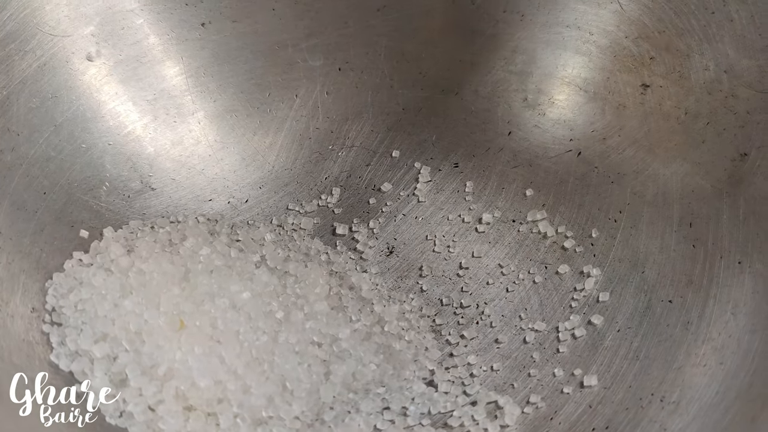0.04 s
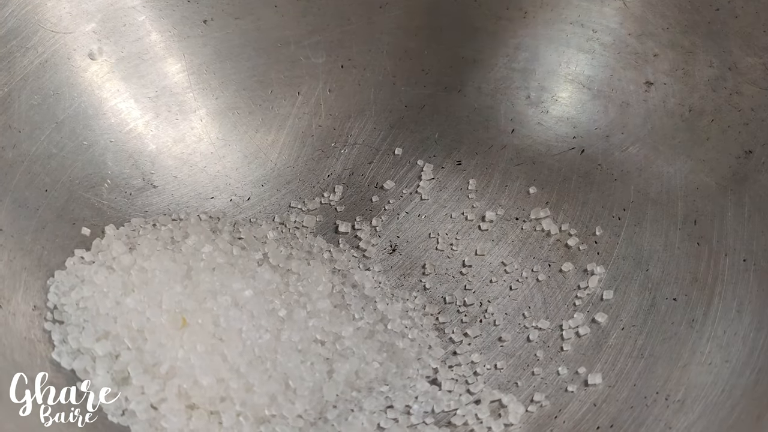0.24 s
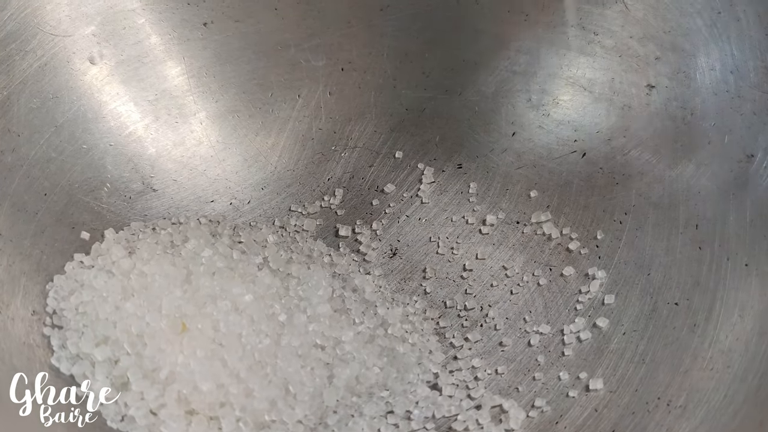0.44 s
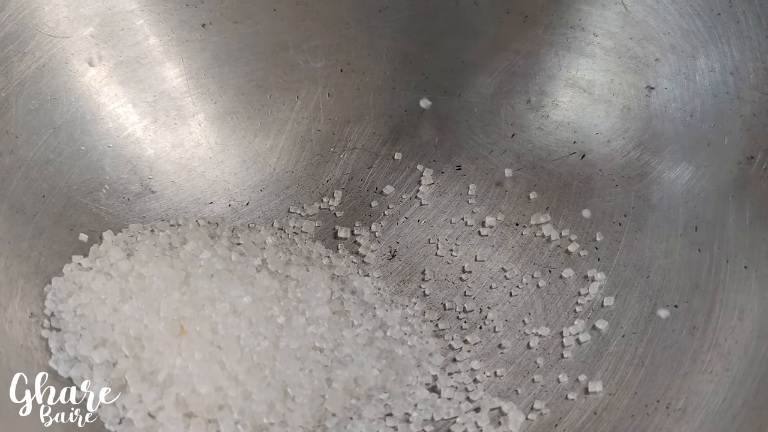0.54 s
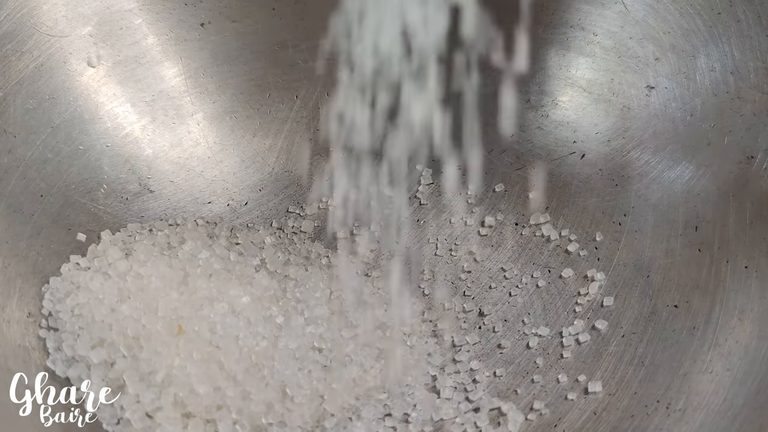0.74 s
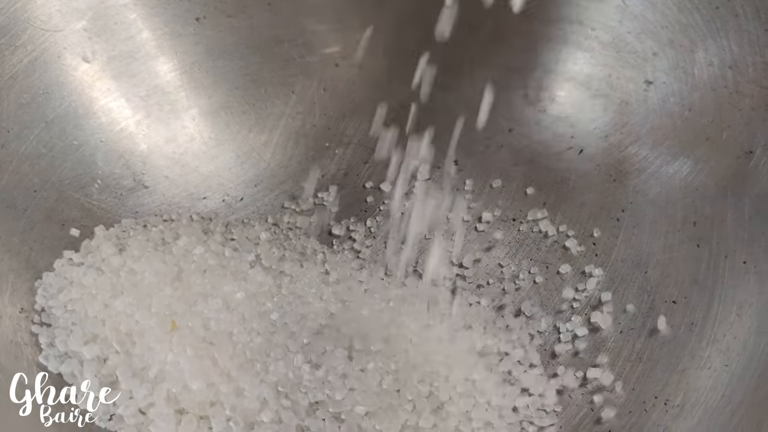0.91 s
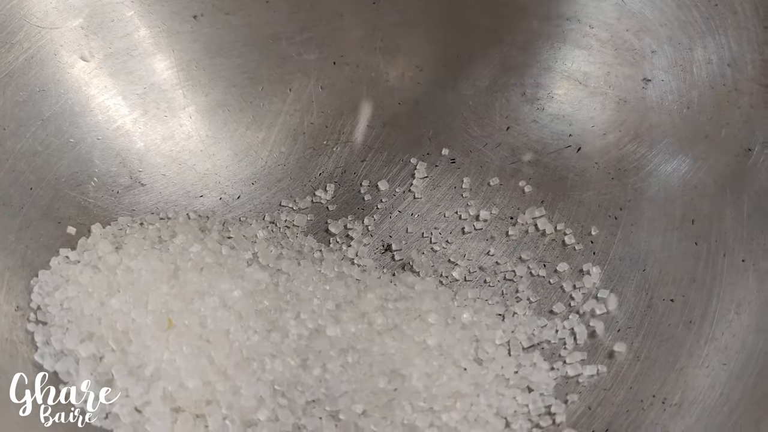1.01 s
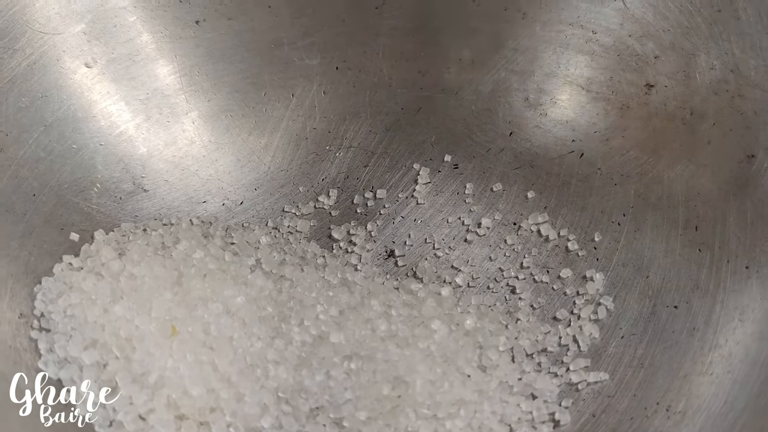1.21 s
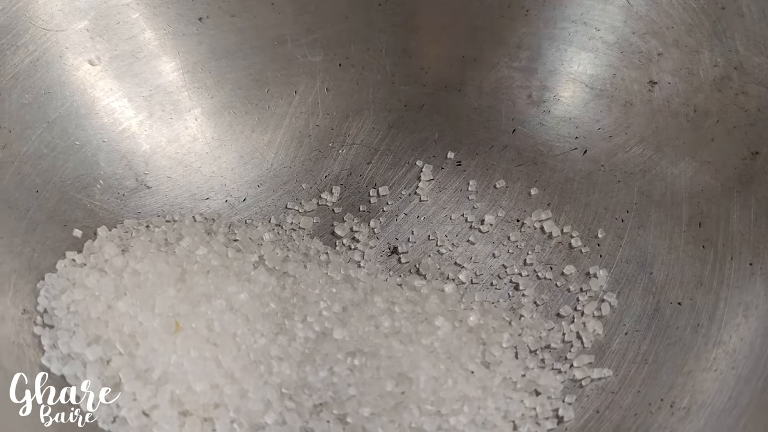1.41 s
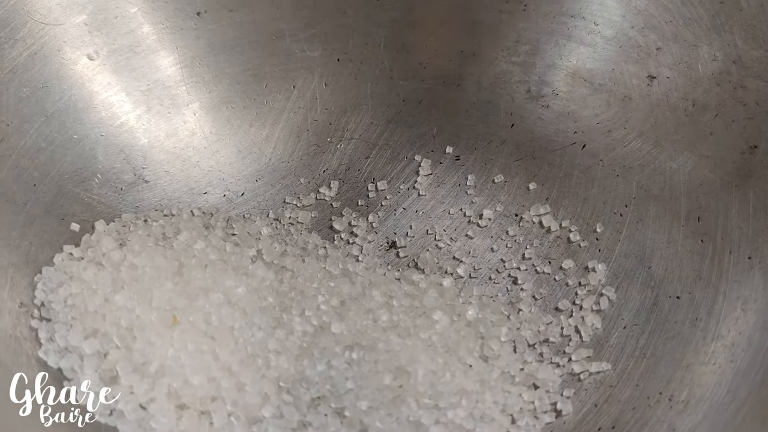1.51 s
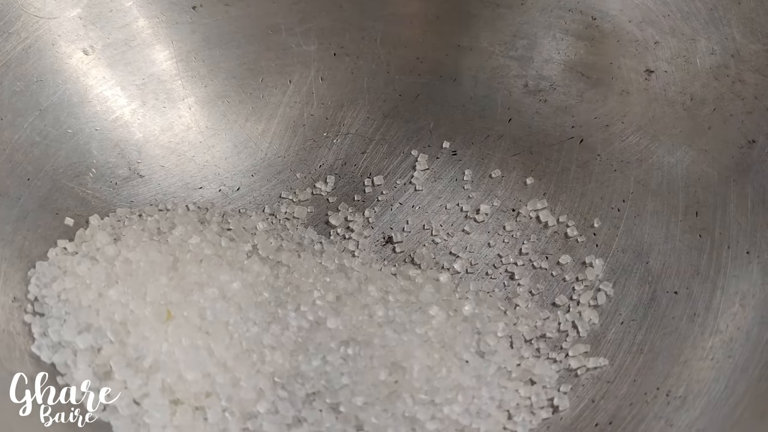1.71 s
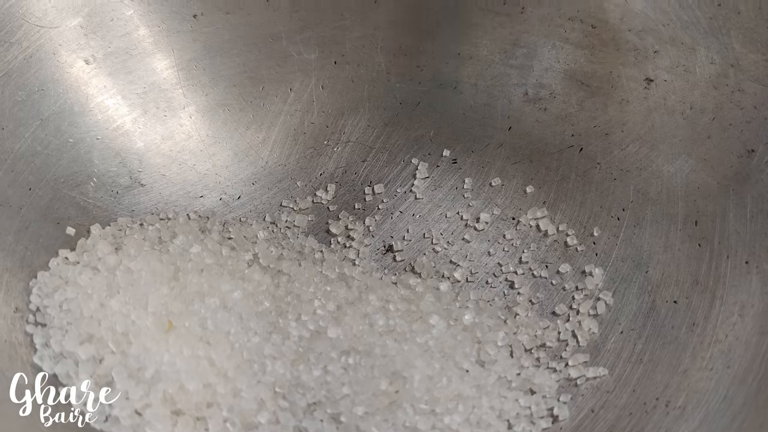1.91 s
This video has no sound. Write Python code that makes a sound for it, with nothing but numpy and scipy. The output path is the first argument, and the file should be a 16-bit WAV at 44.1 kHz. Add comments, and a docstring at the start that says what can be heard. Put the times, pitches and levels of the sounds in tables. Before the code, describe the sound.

Coarse sugar is spooned into a dry steel pan, close in stereo. Crystals crunch and snap in a jar until 0.5 s, sharpest near 0.4. Stray grains tick on metal from 0.57 s; a dense, bright, ringing rush pours at 0.85-1.0 s, then settles amid faint squeaks. From 1.33 s the spoon crunches into the jar again, tapping it at 1.9. Low kitchen rumble and hum.

```python
"""In a small kitchen, coarse sugar is spooned from a jar into a dry steel pan, heard in stereo.
Noise bursts and tiny grains crunch as the spoon scoops; a few stray crystals tick on the metal.
The spoonful patters down in one short rush of grains, coloured by the pan's ringing modes.
The spoon digs back into the jar and taps it; faint squeaks and a low hum lie around it all."""
import sys
import numpy as np
from scipy import signal
from scipy.fft import rfft, irfft
from scipy.io import wavfile

SR = 44100
rng = np.random.default_rng(int(sys.argv[2]) if len(sys.argv) > 2 else 0)


def put_to_file(sound):
    """Save the sound as 16-bit audio at rate SR, in the file named by the first command-line argument."""
    columns = np.atleast_2d(sound).T  # one column per channel
    safe = np.clip(columns, -1, 1)
    whole_steps = np.round(safe * 32767)
    wavfile.write(sys.argv[1], SR, whole_steps.astype(np.int16))


N = 85995
T = np.arange(N) / SR


def amp(db):
    """Decibels to gain."""
    return 10 ** (np.asarray(db) / 20)


def unit(x):
    """Scales to rms 1."""
    return x / np.sqrt(np.mean(x ** 2) + 1e-20)


def read(points, hz):
    """Reads a table on a log-frequency axis."""
    f, value = np.transpose(points)
    return np.interp(np.log(hz + 1), np.log(f + 1), value)


def level(points):
    """Gain over time from a dB curve, fading to silence within 200 samples outside it."""
    s, db = np.transpose(points)
    inside = np.minimum(T - s[0], s[-1] - T)
    return amp(np.interp(T, s, db)) * np.clip(inside * SR / 200 + 1, 0, 1)


def pushes(table):
    """Each push builds up smoothly, then the crystals settle; overlaps add as power."""
    power = 0
    for s, db, rise, fall in table:
        log_shape = np.where(T < s, -.5 * ((T - s) / rise) ** 2, (s - T) / fall)
        power = power + (amp(db) * np.exp(log_shape)) ** 2
    return np.sqrt(power)


def wander(rate_hz):
    """Smooth random motion of rms 1."""
    hz = np.fft.rfftfreq(N, 1 / SR)
    slow = rfft(rng.standard_normal(N)) * np.exp(-(hz / rate_hz) ** 2)
    return unit(irfft(slow, N))


def add(mix, s, sound):
    """Mixes a stereo sound in at a time."""
    part = mix[:, max(round(s * SR), 0):][:, :sound.shape[1]]
    part += sound[:, :part.shape[1]]


def through(x, response):
    """Convolves each channel with a response."""
    return signal.fftconvolve(np.atleast_2d(x), np.atleast_2d(response), axes=1)[:, :N]


def above(x, hz, order):
    """High-pass."""
    return signal.sosfilt(signal.butter(order, min(hz, SR / 3), "high", fs=SR, output="sos"), x)


def colour(x, db_at, size=4096):
    """Minimum-phase filter of unit energy that follows the given dB over frequency."""
    log_gain = np.log(amp(db_at(abs(np.fft.fftfreq(size, 1 / SR)))))
    spectrum = np.exp(np.conj(signal.hilbert(log_gain)))
    h = np.fft.ifft(spectrum).real[:size // 2]
    return through(x, h / np.linalg.norm(h))


def resonate(x, hz, width):
    """A gliding resonance of gain 1: shift down to 0 Hz, smooth, shift back."""
    turn = np.exp(2j * np.pi * np.cumsum(hz) / SR)
    r = np.exp(-np.pi * width / SR)
    return 2 * (turn * signal.lfilter([1 - r], [1, -r], x / turn + 1e-18)).real


def placed(x, image):
    """Sets width and left-right balance by frequency."""
    hz, rows = np.fft.rfftfreq(N, 1 / SR), np.array(image)
    half_balance = read(rows[:, :2], hz) / 2
    width = amp(read(rows[:, ::2], hz))
    left, right = rfft(x)
    mid, side = (left + right) / 2, width * (left - right) / 2
    return irfft(np.array([mid + side, mid - side]) * amp([half_balance, -half_balance]), N)


def blend(a, b, alike):
    """Left is a; right shares the given part of it and takes the rest from b."""
    return np.array([a, alike * a + np.sqrt(1 - alike * alike) * b])


def pair(alike, size):
    """Two partly alike noises, one per channel."""
    a, b = rng.standard_normal((size, 2)).T
    return blend(a, b, alike)


def burst(db, length, alike=0.77, size=4000):
    """A sharp noise crack that dies away exponentially."""
    fade = np.exp(-T[:size] / length)
    x = np.tanh(2 * pair(alike, size)) * fade
    return amp(db) * unit(x) * np.sqrt(np.mean(fade ** 2))


def grains(per_s, spread_db, alike):
    """Tiny impacts at random times, their sizes spread upward in dB."""
    struck = rng.random(N) < per_s / SR
    sizes = amp(spread_db * np.minimum(rng.exponential(1, N), 4)) * struck
    return unit(sizes * np.tanh(pair(alike, N)))


def ring(x, decay_s, direct, size=3000):
    """A dense ring of thin walls, different at each microphone."""
    tail = rng.standard_normal((2, size)) * np.exp(-T[:size] / decay_s)
    ringing = through(x, tail / np.linalg.norm(tail[0]))
    return np.sqrt(direct) * x + np.sqrt(1 - direct) * ringing


def modes(table, size=12000):
    """Ring of an object after a blow, scaled to unit energy."""
    t = T[:size]
    h = np.zeros(size)
    for hz, decay, db in table:
        h += amp(db) * np.sin(2 * np.pi * hz * t) * np.exp(-t / decay) / np.sqrt(decay)
    return h / np.linalg.norm(h)


def drone(table):
    """Modes kept ringing, as by countless small blows, drifting in phase and strength."""
    out = np.zeros(N)
    for hz, width, db in table:
        strength = amp(db) * (1 + 0.75 * wander(width))
        out += strength * np.sin(2 * np.pi * hz * T + wander(width))
    return unit(out)


# the kitchen's time to die away by 60 dB: (frequency [Hz], time [s])
KITCHEN_DECAY = [(200, 0.29), (2000, 0.25), (7000, 0.14), (16000, 0.15)]


def room(x, wet_db, size=20000):
    """Adds the kitchen's short reverberation as decaying noise, different at each microphone."""
    hz, t, z = signal.stft(rng.standard_normal((2, size)), SR, nperseg=256)
    decay = amp(-60 * t / read(KITCHEN_DECAY, hz)[:, None])
    tail = signal.istft(z * decay, SR, nperseg=256)[1]
    tail *= np.minimum(T[:tail.shape[1]] / 0.00057, 1)  # soft onset
    return x + amp(wet_db) * through(x, tail / np.linalg.norm(tail[0]))


# spectrum of the empty kitchen: (frequency [Hz], level [dB])
FLOOR_COLOUR = [(20, 1), (35, -1), (50, -22), (62, 0), (78, 0.5), (98, 5), (125, -9.5), (200, -7),
                (380, -11.5), (600, -18.5), (1200, -24), (3000, -22.5), (7000, -22.5), (16000, -90)]
# likeness of the two microphones: (frequency [Hz], likeness [0 to 1])
FLOOR_LIKENESS = [(60, 1), (300, 0.62), (700, 0.54), (1400, 0.073), (3000, 0.15), (15000, 0.093)]
FLOOR_DB = -54.5  # rms


def floor():
    """Low rumble of the kitchen with a little hiss: shaped noise, most alike in the bass."""
    hz = np.fft.rfftfreq(N, 1 / SR)
    a, b = rfft(rng.standard_normal((2, N)))
    spectrum = blend(a, b, read(FLOOR_LIKENESS, hz)) * amp(read(FLOOR_COLOUR, hz))
    return amp(FLOOR_DB) * unit(irfft(spectrum, N))


# hum of kitchen machines: (frequency [Hz], level [dB])
HUM_TONES = [(49.5, -61), (76, -60.5), (98, -60.5)]
HUM_WAVER_HZ = 18


def hum():
    """Low sine tones that waver in strength, equal at both microphones."""
    out = np.zeros(N)
    for hz, db in HUM_TONES:
        tone = np.sin(2 * np.pi * (hz * T + rng.random()))
        out += amp(db) * unit((1 + .5 * wander(HUM_WAVER_HZ)) * tone)
    return out


# faint high squeaks: (time [s], length [s], start [Hz], end [Hz], level [dB])
SQUEAK_GLIDES = [(.511, 0.065, 5200, 5290, -49), (1.129, 0.055, 5120, 5200, -52.5),
                 (1.147, 0.067, 4760, 4540, -55.5), (1.185, 0.091, 4600, 4710, -64)]
SQUEAK_FUZZ_HZ = 130


def squeaks():
    """Faint, slightly gliding whistles: sines made fuzzy by slow noise."""
    out = np.zeros((2, N))
    fuzz_filter = signal.butter(2, SQUEAK_FUZZ_HZ, fs=SR, output="sos")
    for s, length, start_hz, end_hz, db in SQUEAK_GLIDES:
        u = np.arange(0, 1, 1 / (length * SR))
        fuzz = signal.sosfilt(fuzz_filter, pair(0.65, size=8000))[:, :len(u)]
        tone = np.sin(2 * np.pi * np.cumsum(start_hz + (end_hz - start_hz) * u) / SR)
        add(out, s, amp(db) * unit(fuzz * tone * np.sin(np.pi * u)))
    return out


# crystals snapping under the spoon: (time [s], level [dB], decay [s])
CRYSTAL_SNAPS = [(0.0606, -32, .002), (0.0815, -18, 0.00039), (.1799, -18.5, 0.00083),
                 (0.2055, -30, 0.0011), (0.2144, -30, .002), (0.218, -24.5, 0.0028), (.243, -34, .001),
                 (.2597, -39, .001), (.264, -30, 0.0012), (0.279, -26, 0.0037), (0.292, -34, .002),
                 (.368, -21, 0.00083), (0.3734, -29, 0.0014), (.3766, -21, 0.0012), (0.379, -27, 0.0018),
                 (0.394, -30, 0.0016), (0.398, -29, 0.00068), (0.4072, -12, 0.0005), (0.4085, -17, 0.0012),
                 (0.4183, -24, .0022), (0.4335, -26.5, 0.0017), (0.449, -26, 0.00093),
                 (0.488, -33.5, 0.0016), (0.506, -36, 0.0049)]
# snaps grow fuller as the spoon goes deeper: (time [s], low edge [Hz])
SNAP_LOW_EDGE = [(.18, 7400), (.28, 4240), (.405, 3070)]
# the spoon's ring sinks as it pushes deeper: (time [s], frequency [Hz])
SPOON_SINKING = [(.28, 7150), (.375, 5530)]
# pushes of the spoon through the sugar: (time [s], level [dB], rise [s], fall [s])
SPOON_PUSHES = [(.015, -48, 0.061, 0.25), (.228, -42.5, 0.012, 0.017), (.29, -43.5, 0.026, 0.023),
                (.41, -41.5, 0.034, 0.073)]
# colour of sugar scooped in the jar: (frequency [Hz], level [dB])
SCOOPED_COLOUR = [(100, -13.5), (430, -6), (800, -20), (1150, -3.5), (1500, -13), (2100, -9.5), (2800, -6),
                  (4400, -5), (5500, -1.5), (7100, 0.5), (8500, -5.5), (10000, -3.5), (12000, -7),
                  (14000, -6), (16000, -3)]
# stereo image: (frequency [Hz], left minus right [dB], width [dB])
SCOOP_IMAGE = [(101, -4, -23), (1230, 2, 3), (4000, 2, 1.5), (7050, 2, 0), (11300, 1.5, 3),
               (15000, -1.5, 4.5)]


def scoop():
    """Crystals grind and snap as the spoon works through the jar, its ring sinking."""
    def jar_colour(hz):
        return read(SCOOPED_COLOUR, hz)

    snaps = np.zeros((2, N))
    for s, db, length in CRYSTAL_SNAPS:
        low_hz = np.interp(s, *np.transpose(SNAP_LOW_EDGE))
        add(snaps, s, above(burst(db, length, alike=0.87), low_hz, order=2))
    snaps = colour(ring(snaps, decay_s=0.003, direct=0.71), jar_colour)
    spoon_hz = np.interp(T, *np.transpose(SPOON_SINKING))
    snaps = snaps + amp(5.5) * resonate(snaps, spoon_hz, width=700)
    rubbing = grains(per_s=2500, spread_db=2.5, alike=0.54) * pushes(SPOON_PUSHES)
    grind = colour(rubbing, jar_colour)
    return placed(room(amp(2.5) * snaps, wet_db=-8.5) + room(amp(5.0) * grind, wet_db=-4.0), SCOOP_IMAGE)


# pushes of the second dig: (time [s], level [dB], rise [s], fall [s])
DIG_STROKES = [(1.343, -26.5, 0.0042, 0.019), (1.378, -30, .01, 0.069), (1.4, -30.5, 0.0024, 0.031),
               (1.418, -27.5, 0.0081, 0.092), (1.655, -35, 0.046, 0.09), (1.765, -39, 0.029, 0.066)]
# lumps cracking during the dig: (time [s], level [dB])
LUMP_CRACKS = [(1.335, -28), (1.3437, -20.5), (1.4123, -18.5), (1.426, -37)]
CRACK_DECAY_S = 0.001
# colour of the crunch: (frequency [Hz], level [dB])
CRUNCH_COLOUR = [(100, -26), (300, 0), (780, -10.5), (1200, -5), (4600, -4.5), (6900, 5), (8800, -3.5),
                 (10000, 0), (12300, -6), (13700, -3), (16000, -6)]
# the spoon's thin ring: (frequency [Hz], decay [s], level [dB])
SPOON_MODES = [(6660, 0.0054, 8), (6900, .003, 7), (6960, 0.0033, 29)]
SPOON_DB = -25
# dull grinding deep in the heap: (time [s], level [dB])
DEEP_GRIND = [(1.337, -44), (1.39, -43), (1.415, -36), (1.502, -42), (1.52, -48.5), (1.78, -52.5),
              (1.85, -72)]
# its colour: (frequency [Hz], level [dB])
DEEP_COLOUR = [(80, -26), (170, 2.5), (750, -2), (1900, 1), (6000, -17)]
# the jar's hollow resonances under the grinding: (frequency [Hz], width [Hz], level [dB])
HOLLOW_MODES = [(201.8, 20, -7.5), (305, 25, 0.5), (400, 22, -10), (593, 33, -6)]
HOLLOW_DB = -5  # relative to the grinding curve
# the jar's knock: (frequency [Hz], decay [s], level [dB])
JAR_MODES = [(185.6, 0.033, 4), (283, 0.02, 4)]
BUMP_S, BUMP_DB = 1.341, -28.5  # the spoon bumps into the heap and knocks the jar
# colour of the spoon's tap on the jar: (frequency [Hz], level [dB])
TAP_SPECTRUM = [(300, -38), (1200, -3.5), (2000, -0.5), (4000, 1.5), (6300, 2.5), (8500, -11), (16000, -23)]
TAP_S, TAP_DB, TAP_DECAY_S = 1.8962, -31, 0.0021
# stereo image: (frequency [Hz], left minus right [dB], width [dB])
DIG_IMAGE = [(102, -2.5, -19), (308, 2, -6), (600, 4, 1), (1160, 4, 5.5), (2280, 3.5, 1.5),
             (4200, 0.5, -2.5), (7700, 6, 2.5), (9600, -0.5, -8), (15000, 0.5, 6.5)]


def dig():
    """The spoon bumps into the heap, sticks and slips, cracks lumps and rings the jar; then a light tap."""
    slip = unit(amp(2 * wander(rate_hz=250)))
    crunch = grains(per_s=13000, spread_db=0.0, alike=0.78) * pushes(DIG_STROKES) * slip
    for s, db in LUMP_CRACKS:
        add(crunch, s, burst(db, CRACK_DECAY_S))
    sound = amp(0.33) * colour(crunch, lambda hz: read(CRUNCH_COLOUR, hz))
    sound += amp(SPOON_DB) * through(crunch, modes(SPOON_MODES))
    grind = grains(per_s=2500, spread_db=2.5, alike=0.72) * level(DEEP_GRIND) * slip
    sound += colour(grind, lambda hz: read(DEEP_COLOUR, hz))

    hollow = np.zeros((2, N)) + amp(HOLLOW_DB) * level(DEEP_GRIND) * drone(HOLLOW_MODES)
    knock = modes(JAR_MODES)
    add(hollow, BUMP_S, amp(BUMP_DB) * np.array([knock, knock]) / abs(knock).max())

    tap = np.zeros((2, N))
    add(tap, TAP_S, burst(TAP_DB, TAP_DECAY_S))
    sound = sound + colour(tap, lambda hz: read(TAP_SPECTRUM, hz))
    return placed(room(sound, wet_db=-6.5) + hollow, DIG_IMAGE)


# the pan's response between its modes: (frequency [Hz], level [dB])
PAN_BETWEEN = [(80, -29), (400, -22.5), (1200, -28.5), (2000, -32), (3400, -24), (3650, -8), (8000, -13.5),
               (16000, -18)]
# clusters of the pan's ringing modes: (frequency [Hz], width [Hz], level [dB])
PAN_CLUSTERS = [(3990, 230, -5), (5240, 250, -6), (5870, 120, 2), (6500, 190, 1), (7220, 300, -1.5),
                (8340, 58, -2.5), (9540, 190, -1), (10440, 170, .5), (11350, 220, 1), (13150, 190, 2.5),
                (13400, 84, 4), (14750, 370, 1), (15800, 180, -5)]


def pan_db(hz):
    """The pan's response: weak below its first high modes, bright above."""
    power = amp(read(PAN_BETWEEN, hz)) ** 2
    for f, width, db in PAN_CLUSTERS:
        power = power + amp(db) ** 2 * np.exp(-.5 * ((hz - f) / width) ** 2)
    return 10 * np.log10(power)


# single crystals landing on bare steel: (time [s], level [dB], low edge of the ring [Hz])
STRAY_DROPS = [(.573, -30, 9900), (.612, -19.5, 6000), (0.6534, -29, 4800), (0.6752, -20.5, 6600),
               (0.682, -33, 6940), (0.8349, -19, 4730), (0.8574, -13.5, 5360), (.9655, -38, 8000),
               (1.041, -38, 3940)]


def strays():
    """Single crystals tick on the steel and leave a brief bright ring, with very little room."""
    out = np.zeros((2, N))
    for s, db, low_hz in STRAY_DROPS:
        tick = burst(db, .002, alike=0.31)
        after = burst(db - 5, 0.016, alike=0.19)
        add(out, s, above(tick + after, low_hz, order=4))
    steel = colour(out, lambda hz: .5 * pan_db(hz))
    return room(amp(-1.0) * steel, wet_db=-25)


# flow of sugar onto the steel, a trickle, the rush, then bounces: (time [s], level [dB])
POUR_FLOW = [(.56, -51.5), (.83, -51), (.838, -39), (.851, -31.5), (.858, -27), (.945, -23.5), (1.0, -35.5),
             (1.091, -48), (1.19, -58.5), (1.32, -65)]
# clumps within the pour: (time [s], change of flow [dB], level of the pan's main mode [dB])
POUR_CLUMPS = [(0.858, -5.5, -27), (.891, -2, -22.5), (.906, 1.5, -26), (.921, 0.5, -23.5), (.943, -2, -36)]
CLUMP_WIDTH_S = 0.0034
PAN_RING_S, PAN_DIRECT = 0.0096, 0.2  # decay time, share of energy that does not ring
MAIN_HZ, MAIN_RISE_S, MAIN_FALL_S = 5820, 0.005, 0.0066
# sugar slides off the spoon and onto the soft heap: (time [s], level [dB])
SLIDE_LEVEL = [(.795, -72), (.81, -40.5), (.87, -46), (.97, -48.5), (1.1, -57), (1.3, -63.5)]
# its colour: (frequency [Hz], level [dB])
SLIDE_SPECTRUM = [(100, -22), (420, 2), (1200, 5.5), (2000, -3), (3000, 2), (9000, -6), (16000, 8.5)]
# the pan's low modes: (frequency [Hz], width [Hz], level [dB])
PAN_LOW_MODES = [(298, 7.7, -4.5), (397.4, 20, 4)]
PAN_LOW_DB = -8  # relative to the slide
# stereo image: (frequency [Hz], left minus right [dB], width [dB])
POUR_IMAGE = [(100, 0.38, -23), (1010, -0.096, 0.5), (4500, 0.6, -8), (7900, 0.89, 4.5), (15000, -1.4, -1)]


def pour(count=5):
    """The spoonful slides off and hails on the pan; clumps set it ringing, bouncing crystals settle."""
    clump_db = sum(db * np.exp(-.5 * ((T - s) / CLUMP_WIDTH_S) ** 2) for s, db, _ in POUR_CLUMPS)
    flow = level(POUR_FLOW) * amp(clump_db)
    hail = np.zeros((2, N))
    for _ in range(count):  # each stream of grains gets its own ring
        stream = grains(per_s=320, spread_db=3.0, alike=0.78)
        hail += ring(stream, PAN_RING_S, PAN_DIRECT)
    hail = amp(2.0) * colour(unit(hail) * flow, pan_db)

    blows = pushes([(s, db, MAIN_RISE_S, MAIN_FALL_S) for s, _, db in POUR_CLUMPS])
    main = blows * np.sin(2 * np.pi * MAIN_HZ * T + .9 * wander(rate_hz=140))
    sliding = grains(per_s=5100, spread_db=3.0, alike=0.34) * level(SLIDE_LEVEL)
    slide = colour(sliding, lambda hz: read(SLIDE_SPECTRUM, hz))
    low = amp(PAN_LOW_DB) * level(SLIDE_LEVEL) * drone(PAN_LOW_MODES)
    return room(placed(hail + slide, POUR_IMAGE), wet_db=-6.0) + main + low


def scene():
    """Scoop, strays, pour and the next dig, over the room."""
    return floor() + hum() + squeaks() + scoop() + dig() + strays() + pour()


EDGE_HZ = 15850


def record(dry):
    """The recorder's band limit: a steep low-pass."""
    low_pass = signal.firwin(511, EDGE_HZ, window=("kaiser", 9), fs=SR)
    return signal.oaconvolve(dry, low_pass[None], "same")


dry = scene()
out = record(dry)
put_to_file(out)
```